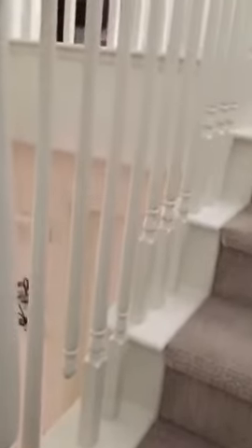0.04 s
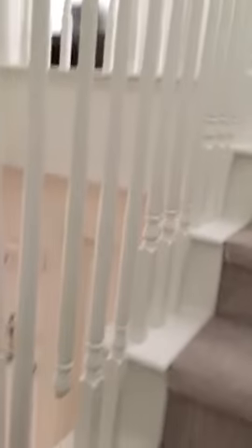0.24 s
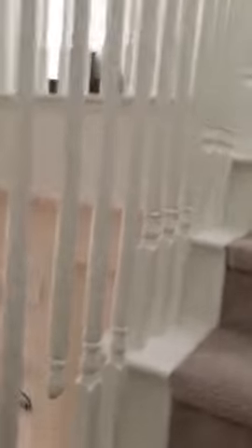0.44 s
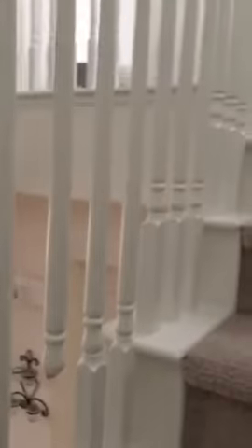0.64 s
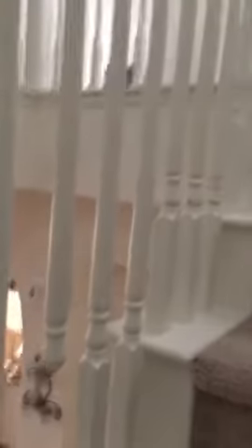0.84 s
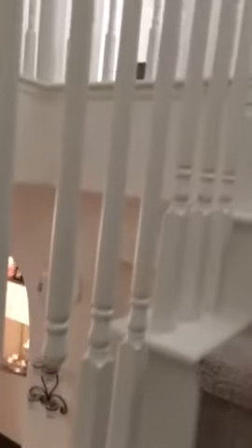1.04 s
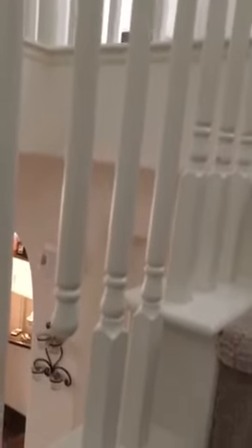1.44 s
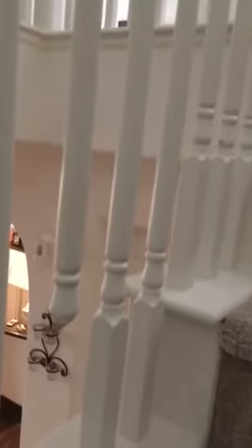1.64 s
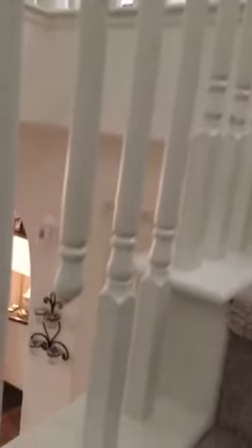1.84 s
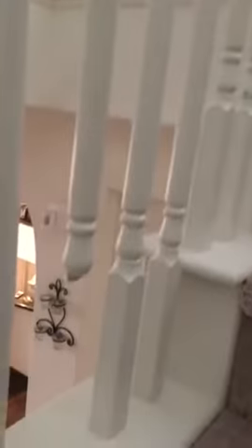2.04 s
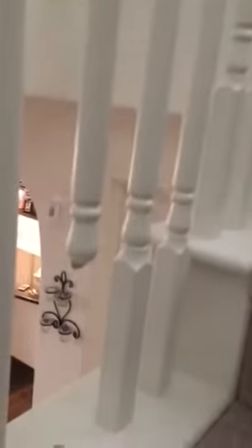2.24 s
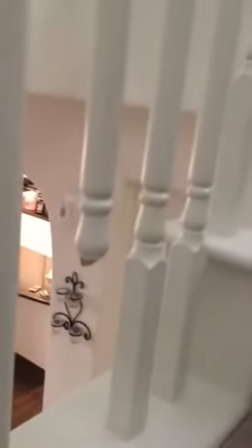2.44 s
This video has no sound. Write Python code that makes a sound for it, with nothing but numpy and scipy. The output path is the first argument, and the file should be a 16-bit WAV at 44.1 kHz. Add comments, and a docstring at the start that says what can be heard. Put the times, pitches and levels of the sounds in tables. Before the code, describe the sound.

One soft footstep thumps on a carpeted wooden staircase, with a brief low boom. Clothes swish and a sleeve rubs faintly, then a small tick comes, close to a hand-held microphone in a quiet, faintly humming house.

```python
"""A carpeted wooden staircase in a quiet house, one soft step heard from a hand-held microphone.
The sole brushes the carpet, the boards knock and the weight sets the whole flight booming.
Clothes swish and a sleeve rubs as the body moves on, echoed by the near walls; a small double tick
comes late. Behind it all, a household machine hums faintly under the room's own hush."""
import sys
import numpy as np
from scipy import signal
from scipy.fft import rfft, irfft
from scipy.io import wavfile

SR = 44100
rng = np.random.default_rng(int(sys.argv[2]) if len(sys.argv) > 2 else 0)


def dump_mix(stems):
    """Bounce the given channels to the path in sys.argv[1] as a 16-bit WAV at rate SR."""
    frames = np.atleast_2d(stems).T  # one column per channel
    limited = np.clip(frames, -1, 1)  # hard clip at full scale
    pcm = np.round(limited * 32767).astype(np.int16)
    wavfile.write(sys.argv[1], SR, pcm)


N = 110250
TIME = np.arange(N) / SR
BIN_HZ = np.arange(N // 2 + 1) * SR / N


def from_db(db):
    """Decibels to gain."""
    return 10 ** (np.asarray(db) / 20)


def unit_rms(x):
    """Scale to unit rms."""
    return x / np.sqrt(np.mean(x ** 2) + 1e-20)


def coloured(x, colour):
    """Shape a steady noise by (frequency [Hz], relative level [dB]) points; rms 1."""
    hz, db = np.transpose(colour)
    curve_db = np.interp(np.log(np.maximum(BIN_HZ, 1)), np.log(hz), db)
    return unit_rms(irfft(rfft(x) * from_db(curve_db), N))


def noise(colour):
    """Smooth noise of a given spectrum; rms 1."""
    return coloured(rng.standard_normal(N), colour)


def drift(rate_hz):
    """Slow random wander; rms 1."""
    return unit_rms(irfft(rfft(rng.standard_normal(N)) / (1 + (BIN_HZ / rate_hz) ** 4), N))


def ring(force, hz, t60):
    """One mode: a unit impulse starts a decaying sine of height 1."""
    radius, angle = from_db(-60 / (t60 * SR)), 2 * np.pi * hz / SR
    return signal.lfilter([0, np.sin(angle)], [1, -2 * radius * np.cos(angle), radius ** 2], force + 1e-18)


def resonance(x, hz, q):
    """Band-pass with gain 1 at its centre."""
    return signal.lfilter(*signal.iirpeak(hz, q, fs=SR), x)


def push(start, length):
    """A smooth contact force of unit area."""
    return np.sin(np.pi * np.clip((TIME - start) / length, 0, 1)) ** 2 * 2 / (length * SR)


def burst(start, attack, t60):
    """Quick rise and exponential decay, timed in seconds."""
    age = np.maximum(TIME - start, 0)
    return np.minimum(age / attack, 1) * np.exp(-np.log(1000) * age / t60)


def swell(peak_time, db, rise, fall, stretch=1):
    """A bell-shaped stroke with its own rise and fall."""
    width = stretch * np.where(TIME < peak_time, rise, fall)
    return from_db(db) * np.exp(-.5 * ((TIME - peak_time) / width) ** 2)


# Weight coming onto the tread: (time [s], level [dB], contact time [s])
LOADS = [(0.2091, -26.5, 0.0093), (0.2546, -31.5, 0.0098), (0.3087, -29, 0.016), (0.413, -36, 0.029)]
# Deep modes of the flight: (frequency [Hz], level [dB], t60 [s])
STAIR_MODES = [(36.9, -22.5, 0.8), (54.62, -0.5, 0.77), (60.85, -2.5, 0.59), (70.4, -3.4, 0.34),
               (91.03, -0.5, 0.42)]

def staircase():
    """Soft loads set the whole flight booming."""
    force = sum(from_db(db) * push(start, length) for start, db, length in LOADS)
    return sum(from_db(db) * ring(force, hz, t60) for hz, db, t60 in STAIR_MODES)


# Light knocks underfoot: (time [s], level [dB])
KNOCKS = [(0.197, -57), (0.2122, -61.5), (0.2886, -57), (0.3159, -59.5)]
# Modes of the boards: (frequency [Hz], level [dB], t60 [s])
BOARD_MODES = [(158, -8, 0.16), (199, -7.5, 0.29), (247.7, 2.5, 0.24), (295, -2.5, 0.17), (391.2, -1, 0.31),
               (471, -10.5, 0.91), (700, -5, .3)]

def boards():
    """The boards knock under the load, each mode ringing a little differently every time."""
    mode_gains = from_db(rng.normal(0, 0.71, (len(KNOCKS), len(BOARD_MODES)))).T
    forces = np.array([from_db(db) * push(start, length=.002) for start, db in KNOCKS])
    return sum(from_db(db) * ring(gains @ forces, hz, t60)
               for gains, (hz, db, t60) in zip(mode_gains, BOARD_MODES))


# Scuffs on the carpet: (time [s], level [dB], t60 [s])
SCUFFS = [(0.194, -50, 0.12), (0.211, -64, 0.42), (0.232, -61, 0.38), (0.285, -61.5, 0.63),
          (0.528, -64, .04)]
# Their muffled spectrum: (frequency [Hz], level [dB])
SCUFF_COLOUR = [(150, 3), (400, 0.5), (800, -8.5), (1600, -14), (3000, -22), (7000, -28), (15000, -38.5)]

def sole():
    """The sole makes short puffs of friction on the carpet pile."""
    envelope = sum(from_db(db) * burst(start, attack=0.0036, t60=t60) for start, db, t60 in SCUFFS)
    return noise(SCUFF_COLOUR) * envelope


def cloth_friction(colour, grains_per_s=1100, spread_db=3, grain_db=-11):
    """Sliding cloth: smooth hiss with tiny grains where fibres catch."""
    grains = (rng.random(N) < grains_per_s / SR) * rng.choice([-1, 1], N)
    strength = from_db(spread_db * np.minimum(rng.exponential(1, N), 4))
    return coloured(rng.standard_normal(N) + from_db(grain_db) * unit_rms(grains * strength), colour)


# Clothes moving on the stairs: (peak time [s], level [dB], rise [s], fall [s])
SWISHES = [(0.52, -62, 0.17, 0.17), (0.81, -72.5, 0.14, 0.11)]
# Spectrum of a swish: (frequency [Hz], level [dB])
SWISH_COLOUR = [(150, 6), (400, 5.5), (700, 0), (1300, -2.5), (1650, -6.5), (2100, -3), (2900, -9),
                (4100, -8.5), (6500, -13.5), (7600, -17.5), (9500, -17), (15000, -27.5)]
# Cloth snagging and letting go: (time [s], level [dB])
SNAGS = [(0.469, -62.5), (0.52, -61.5), (0.859, -66), (1.111, -69)]
# Spectrum of a snag: (frequency [Hz], level [dB])
SNAG_COLOUR = [(300, -6), (2500, -21), (3700, 1.5), (6300, -1), (8000, -8), (15000, -16)]

def clothes(treble_narrowing=0.05, flutter_db=1.26):
    """Fluttering swishes of cloth, brightest at their fastest, with a few snags."""
    friction = cloth_friction(SWISH_COLOUR)
    snags = sum(from_db(db) * burst(start, attack=0.0014, t60=0.029) for start, db in SNAGS)
    cloth = noise(SNAG_COLOUR) * snags
    for hz in 500 * 2 ** np.arange(7):  # peel off octave bands, lowest first
        band = signal.sosfiltfilt(signal.butter(2, min(hz, .45 * SR), fs=SR, output="sos"), friction)
        friction = friction - band
        stretch = (hz / 1000) ** -treble_narrowing  # treble needs speed, so its swell is shorter
        cloth += band * sum(swell(*stroke, stretch) for stroke in SWISHES)
    return cloth * from_db(flutter_db * drift(rate_hz=34))


# Sleeve rubs: (peak time [s], level [dB], rise [s], fall [s], resonance [Hz], its strength [dB])
RUBS = [(0.03, -69, 0.14, 0.091, 400, -5.5), (1.05, -69.5, 0.097, 0.066, 1395, -10.5),
        (1.229, -74.5, 0.034, .05, 1387, -8), (1.59, -82, 0.031, .06, 1100, -1),
        (1.63, -80.5, 0.043, 0.032, 2550, 0), (2.04, -78.5, 0.092, .06, 890, -5.5),
        (2.315, -72, 0.035, 0.086, 1220, -12)]
# Their dull spectrum: (frequency [Hz], level [dB])
RUB_COLOUR = [(150, 4.5), (400, 3), (800, -4), (1400, -11.5), (2200, -18.5), (5000, -25), (15000, -40)]

def sleeve(q=3):
    """A sleeve rubs dully, each stroke with a soft resonance of its own."""
    friction = cloth_friction(RUB_COLOUR)
    rubs = np.zeros(N)
    for *stroke, hz, db in RUBS:
        resonant = unit_rms(resonance(resonance(friction, hz, q), hz, q))
        rubs += unit_rms(friction + from_db(db) * resonant) * swell(*stroke)
    return rubs


# A small double tick: (time [s], level [dB])
TICKS = [(2.3049, -59.5), (2.311, -76)]
# Its spectrum: (frequency [Hz], level [dB])
TICK_COLOUR = [(300, 7), (1500, 3), (3500, 0), (5800, -1), (9500, -4), (15000, -13)]

def ticks(wash_db=-14.5):
    """Dry ticks reach the microphone, each with a faint wash from the stairwell."""
    direct = sum(from_db(db) * burst(start, attack=0.00029, t60=0.027) for start, db in TICKS)
    wash = sum(from_db(db + wash_db) * burst(start, attack=0.0027, t60=0.74) for start, db in TICKS)
    return direct * noise(TICK_COLOUR) + wash * noise(TICK_COLOUR)


# Reflections off the near walls and treads: (delay [s], level [dB])
ECHOES = [(.0071, -16), (0.013, -13), (0.0178, -12), (.0289, -12.5), (0.0425, -12.5)]

def stairwell(x):
    """Near surfaces add a few early echoes."""
    return x + sum(from_db(db) * np.pad(x, (int(delay * SR), 0))[:N] for delay, db in ECHOES)


# Course of the low hum at the microphone: (time [s], rms level [dB])
HUM_LEVEL = [(0, -58), (.6, -60), (1.1, -59.5), (1.45, -58.5), (1.62, -57), (1.85, -58.5), (2.07, -66.5),
             (2.26, -78), (2.45, -62.5)]

def machine(hum_hz=70.74, whine_hz=290.1):
    """A machine somewhere in the house gives a low hum and a thin whine, both wavering."""
    hum_db = np.interp(TIME, *np.transpose(HUM_LEVEL)) + 1.54 * drift(rate_hz=5.6)
    whine_db = -76.5 + 2.0 * drift(rate_hz=12)
    slip_rad = 0.64 * drift(rate_hz=7.5)
    hum = from_db(hum_db) * np.sin(2 * np.pi * hum_hz * TIME)
    whine = from_db(whine_db) * np.sin(2 * np.pi * whine_hz * TIME + slip_rad)
    return np.sqrt(2) * (hum + whine)


# Low rumble of the house: (frequency [Hz], level [dB])
RUMBLE = [(20, -18.5), (35, 11), (55, 5.5), (100, 7.5), (140, -15), (250, -47)]
# Room air and microphone hiss: (frequency [Hz], level [dB])
HUSH = [(60, -16), (130, 2), (200, 3.5), (320, -1), (450, -6.5), (800, -10.5), (1300, -13), (2100, -16),
        (3500, -19), (7000, -21), (12000, -24.5), (15500, -27.5)]

def room_tone(rumble_db=-65.5, hush_db=-71.5):
    """Steady rumble under the hush of the air and the microphone."""
    return from_db(rumble_db) * noise(RUMBLE) + from_db(hush_db) * noise(HUSH)


def scene():
    """Step, clothing and house, all at one hand-held microphone."""
    background = machine() + room_tone()
    step = staircase() + boards() + sole()
    clothing = stairwell(clothes() + sleeve())
    return (step + clothing + ticks() + background)[None]


# Narrow dips of the microphone port: (frequency [Hz], Q, depth [0-1])
PORT_DIPS = [(4860, 12.6, 0.42), (7570, 10, 0.29), (10470, 18, .5)]

def record(dry, low_cut_hz=31, high_cut_hz=15700):
    """The microphone port dents the treble; the deepest bass and the top are cut."""
    x = signal.sosfilt(signal.butter(6, low_cut_hz, "high", fs=SR, output="sos"), dry)
    for hz, q, depth in PORT_DIPS:
        x = x - depth * resonance(x, hz, q)
    return signal.sosfilt(signal.ellip(10, .1, 70, high_cut_hz, fs=SR, output="sos"), x)


dry = scene()
out = record(dry)
dump_mix(out)
```